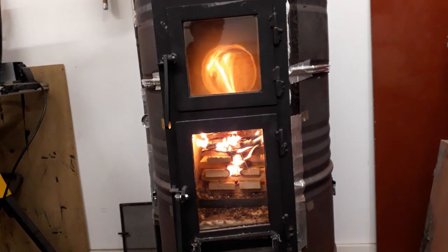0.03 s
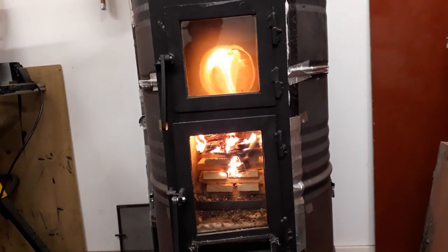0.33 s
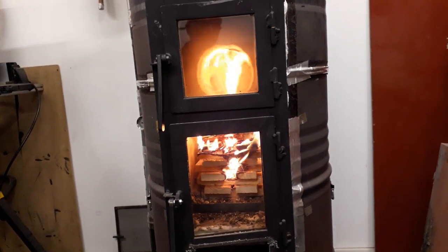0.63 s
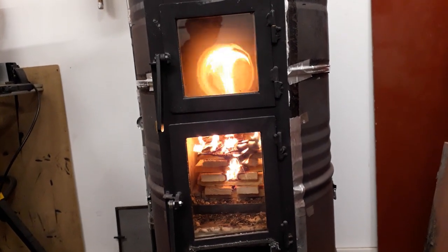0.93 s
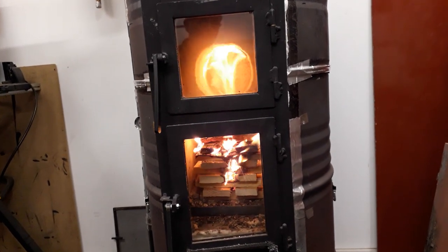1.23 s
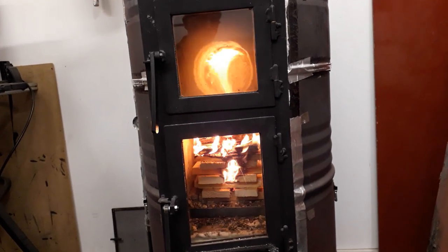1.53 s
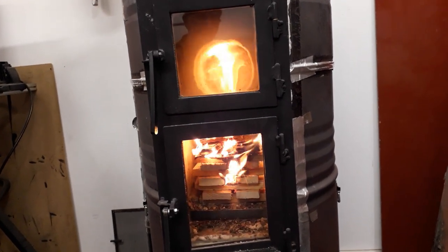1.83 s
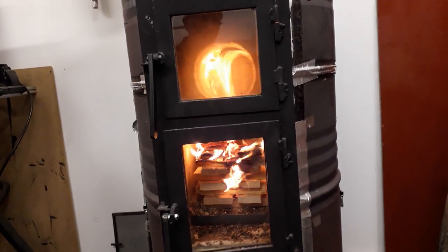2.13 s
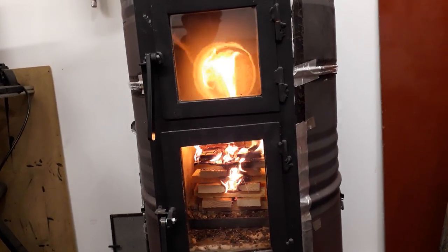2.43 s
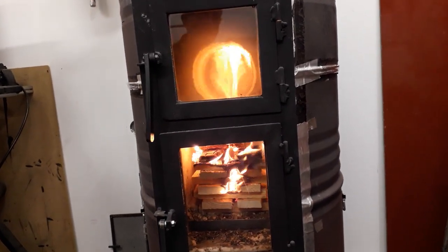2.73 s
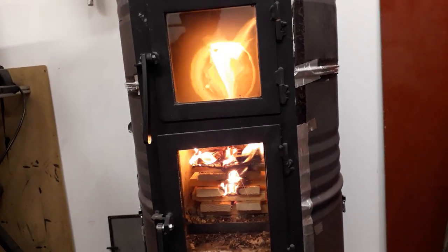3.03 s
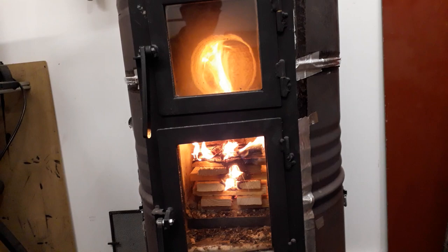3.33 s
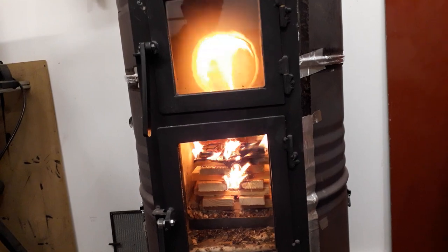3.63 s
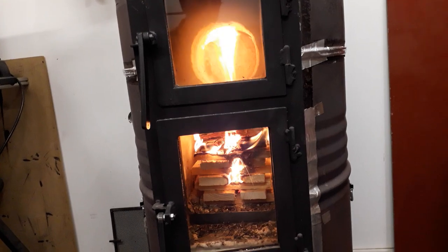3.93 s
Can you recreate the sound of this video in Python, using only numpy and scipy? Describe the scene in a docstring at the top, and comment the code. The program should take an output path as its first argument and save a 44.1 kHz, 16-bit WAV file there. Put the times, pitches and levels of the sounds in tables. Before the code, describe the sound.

Low fluttering roar of a burning wood stove, with scattered cracks and faint sizzles.

```python
"""A wood stove burning in a small room, the microphone close in front of its glass doors.
The fluttering flame drives the low resonances of firebox and flue. Logs crack, and the steel
chamber rings briefly after each crack; fine sizzles and two soft knocks come through as well.
The stove sits dead centre, over a faint, even hiss with some stereo width."""
import sys
import numpy as np
from scipy import signal
from scipy.fft import rfft, irfft
from scipy.io import wavfile
from scipy.ndimage import uniform_filter1d

SR = 44100
rng = np.random.default_rng(int(sys.argv[2]) if len(sys.argv) > 2 else 0)


def pcm_store(signal):
    """Save signal as 16-bit PCM."""
    levels = np.round(np.clip(np.atleast_2d(signal), -1, 1) * 32767)
    wavfile.write(sys.argv[1], SR, levels.astype(np.int16).T)


N = 176400

# resonances of firebox, flue and room: pitch_hz, width_hz, relative_db
CAVITY_MODES = [(43, 10, -29.5), (59.6, 16, -18.5), (85.2, 16, -11), (106.55, 11, -4), (130.9, 25.8, 2),
                (164, 25.8, -2), (208, 23.3, -5.5), (259.8, 24, -10.5), (296.4, 18.6, -12.5),
                (332, 45, -16.5), (382, 78, -23.5), (442.8, 49, -19), (501, 54, -29.5), (564, 50, -29.5),
                (627, 120, -38)]
# strength of the lowest rumble: time_s, level_db
RUMBLE_LEVELS = [(0, -63), (.7, -66), (1.3, -61), (2.1, -62.5), (2.9, -63.5), (3.98, -62)]
# strength of the flame's steady roar: time_s, deep_db, upper_db
ROAR_LEVELS = [(0, -47.5, -61), (.12, -50.5, -64.5), (.21, -51.5, -69.5), (.33, -54, -67.5), (.4, -50, -63),
               (.7, -48.5, -64.5), (.82, -54, -63), (1.13, -49, -63.5), (1.24, -54.5, -71),
               (1.42, -49, -64), (1.62, -51.5, -62), (1.99, -52, -64), (2.17, -47.5, -61),
               (2.48, -51.5, -67), (2.652, -53, -62.5), (2.85, -50, -60.5), (3.1, -49.5, -62.5),
               (3.45, -48, -61), (3.66, -49.5, -64.5), (3.98, -48, -57.5)]
# flare-ups of the flame: peak_s, spread_s, deep_db, upper_db
FLARE_UPS = [(0.028, 0.026, -57, -63), (0.084, 0.006, -45.5, -61), (0.897, 0.04, -47, -67),
             (1.329, 0.036, -46.5, -56.5), (1.522, 0.014, -53, -57.5), (1.594, 0.037, -48.5, -60),
             (1.858, 0.034, -41.5, -60), (2.127, 0.024, -49, -61), (2.214, 0.015, -46.5, -55),
             (2.732, .025, -46.5, -70), (2.957, 0.011, -45, -53.5), (3.007, 0.029, -53, -58.5),
             (3.204, .012, -44.5, -52), (3.242, 0.026, -42.5, -63), (3.347, 0.014, -43, -54),
             (3.728, 0.014, -45.5, -64), (3.846, 0.024, -49.5, -54), (3.967, 0.05, -51, -63)]
# cracks of the logs: start_s, chamber_db, wood_db, snap_over_ring_db
LOG_CRACKS = [(.246, -86, -70, 8), (.353, -84.5, -76, 12), (.423, -84, -71, 4), (.766, -71, -86, 0),
              (.778, -73, -87, -2), (.819, -87, -70, 7), (1.128, -69.5, -76, 12), (1.139, -57, -62, -2),
              (1.219, -88, -75, 14), (1.302, -55, -70, 1), (1.362, -76, -75.5, 8), (1.446, -71, -70, 6),
              (1.594, -93, -83, 16), (1.686, -85, -67.5, 1), (1.766, -70, -65.5, -6), (1.776, -60, -68, -3),
              (1.821, -67.5, -62, 5), (1.912, -72, -64, 7), (2.135, -59.5, -62.5, -10),
              (2.18, -71, -75, 18.5), (2.22, -75, -67.5, 8), (2.232, -78, -71, 14),
              (2.373, -80.5, -87, 13.5), (2.563, -75, -69, 4), (2.774, -68.5, -69.5, 5),
              (2.892, -72, -69.5, 2), (2.926, -59.5, -62.5, -5), (3.008, -59, -59.5, -2),
              (3.021, -63, -53, 14), (3.025, -58, -67, 7), (3.111, -87, -80, 13), (3.17, -63, -67, -8),
              (3.238, -71.5, -72.5, 12.5), (3.681, -74.5, -74, 10), (3.717, -59.5, -63, -4),
              (3.766, -60.5, -68, -8), (3.777, -60, -66.5, 10.5)]
# colour of the steel chamber's ring: frequency_hz, relative_db
CHAMBER_COLOUR = [(900, -45), (2000, -23.5), (2750, -24), (3200, -7.5), (3520, -5.5), (3780, 1),
                  (4020, -2.5), (4400, -18.5), (4750, -15.5), (5050, -8), (5750, -14.5), (6600, -30),
                  (12000, -48)]
# colour of splitting wood: frequency_hz, relative_db
WOOD_COLOUR = [(3000, -31.5), (5300, -3.5), (6700, -7), (7500, -3), (8600, 1), (9200, -4.5), (10200, -6.5),
               (11400, -5), (12400, -9), (14000, -13.5), (16000, -14.5)]
# ringing steel panels: start_s, pitch_hz, width_hz, level_db, t60_s
PANEL_PINGS = [(1.303, 1893, 127, -61.5, 0.33), (1.303, 1330, 200, -76, 0.41),
               (1.303, 2350, 400, -71.5, 0.46), (1.302, 11200, 400, -68.5, 0.12),
               (1.302, 3900, 500, -52.5, .04), (2.892, 2330, 65, -77, .3), (2.942, 2330, 38, -73.5, 0.35),
               (2.903, 5100, 300, -64, 0.16), (3.022, 1970, 400, -75, 0.46), (3.73, 2030, 200, -80, 0.43),
               (.353, 7550, 650, -75, 0.29), (.005, 5150, 660, -79, 1), (.775, 3530, 600, -69, .2),
               (1.775, 3260, 620, -67.5, 0.22), (3.022, 10000, 200, -57, 0.15),
               (3.022, 4960, 860, -57, 0.33), (1.14, 3800, 380, -59.5, 0.27)]
# spurts of sizzling: peak_s, spread_s, level_db
SIZZLE_SPURTS = [(0.017, 0.047, -76.5), (.088, 0.0074, -71), (.115, 0.007, -65.5), (.16, 0.022, -75),
                 (0.29, 0.021, -71.5), (.424, 0.0014, -61.5), (0.476, 0.025, -68.5), (0.88, 0.0037, -66),
                 (0.887, 0.0032, -63), (1.686, .002, -64), (3.528, 0.0042, -67.5), (3.557, 0.028, -72),
                 (3.612, .002, -63), (3.623, 0.0053, -58.5), (3.6346, 0.00065, -51)]
# colour of the sizzling: frequency_hz, relative_db
SIZZLE_COLOUR = [(1500, -12.5), (5200, -12.5), (6400, -13), (7300, -5.5), (8600, 2), (9400, -10.5),
                 (11100, 1.5), (12200, -6), (14000, -4), (16000, -15.5)]
# soft knocks: start_s, level_db
SOFT_KNOCKS = [(3.543, -55.5), (3.64, -50)]
# colour of a knock: frequency_hz, relative_db
KNOCK_COLOUR = [(60, -10), (200, -0.5), (500, -9), (900, -15.5), (1400, -20), (2200, -29), (4000, -42)]
# hiss common to left and right: frequency_hz, relative_db
HISS_MID_COLOUR = [(410, -17), (700, -2.5), (1100, -5), (2000, -5.5), (2800, -7), (3700, -5), (6000, -9.5),
                   (7500, -9), (9800, -10.5), (11500, -8), (14000, -6), (15500, -7)]
# hiss opposed between left and right: frequency_hz, relative_db
HISS_SIDE_COLOUR = [(120, -19), (280, -7.5), (470, 7), (800, -6), (1700, -8.5), (3300, -5.5), (5000, 0.5),
                    (9000, 2), (14000, 3.5)]

DEEP_FROM_HZ, UPPER_FROM_HZ = 93, 235  # the flame's bands: rumble, deep, upper
SNAP_DECAY_S, RING_RISE_S, CHAMBER_T60_S, WOOD_T60_S = .0024, .0056, .28, .3
SIZZLE_ROOM_DB, SIZZLE_T60_S, KNOCK_DECAY_S = -7, .35, .003
HISS_MID_DB, HISS_SIDE_DB = -73.5, -79
T60_PER_DECAY = np.log(1000)  # time constants in a fall of 60 dB


def flame(t):
    """Uneven eddies drive firebox and flue; the roar flutters, and flare-ups lift all but the rumble."""
    eddies = flicker(per_s=90, spread_db=2.5)
    modes = [(hz, undb(db) * resonate(eddies * rng.standard_normal(N), hz, width))
             for hz, width, db in CAVITY_MODES]
    rumble = hold_level(sum(mode for hz, mode in modes if hz < DEEP_FROM_HZ))
    deep = hold_level(sum(mode for hz, mode in modes if DEEP_FROM_HZ <= hz < UPPER_FROM_HZ))
    upper = hold_level(sum(mode for hz, mode in modes if hz >= UPPER_FROM_HZ))
    rumble_gain = undb(np.interp(t, *np.array(RUMBLE_LEVELS).T))
    times, deep_db, upper_db = np.array(ROAR_LEVELS).T
    deep_power = undb(np.interp(t, times, deep_db)) ** 2
    upper_power = undb(np.interp(t, times, upper_db)) ** 2
    for peak, spread, flare_deep_db, flare_upper_db in FLARE_UPS:
        flare = swell(t - peak, spread)
        deep_power += (undb(flare_deep_db) * flare) ** 2
        upper_power += (undb(flare_upper_db) * flare) ** 2
    roar = rumble * rumble_gain + deep * np.sqrt(deep_power) + upper * np.sqrt(upper_power)
    return roar * unit(flicker(per_s=40, spread_db=.8))


def log_cracks(t):
    """Wood splits with a sharp snap; dense reflections build and die away in the steel chamber."""
    chamber_power, wood_power = 0, 0
    for start, chamber_db, wood_db, snap_db in LOG_CRACKS:
        age = t - start
        snap = undb(snap_db) * fade(age, SNAP_DECAY_S * T60_PER_DECAY)
        build = 1 - np.exp(-np.maximum(age, 0) / RING_RISE_S)
        chamber_power += (undb(chamber_db) * (snap + build * fade(age, CHAMBER_T60_S))) ** 2
        wood_power += (undb(wood_db) * (snap + build * fade(age, WOOD_T60_S))) ** 2
    grain = unit(flicker(per_s=700, spread_db=1.5))
    chamber = np.sqrt(chamber_power) * noise(CHAMBER_COLOUR)
    wood = np.sqrt(wood_power) * noise(WOOD_COLOUR)
    return grain * (chamber + wood)


def panel_pings(t):
    """Clusters of close modes in the steel panels ring on after some cracks."""
    return sum(undb(db) * fade(t - start, t60) * resonate(rng.standard_normal(N), hz, width)
               for start, hz, width, db, t60 in PANEL_PINGS)


def sizzles(t):
    """Spurts of tiny bright ticks reach the microphone directly, then as a short room tail."""
    spurts = sum(undb(db) * swell(t - peak, spread) for peak, spread, db in SIZZLE_SPURTS)
    grain = unit(flicker(per_s=1500, spread_db=2))
    direct = spurts * grain * noise(SIZZLE_COLOUR)
    room = unit(rng.standard_normal(N) * fade(t, SIZZLE_T60_S)) / np.sqrt(N)  # energy 1
    return direct + undb(SIZZLE_ROOM_DB) * signal.fftconvolve(direct, room)[:N]


def knocks(t):
    """Two dull, very short bumps."""
    bumps = sum(undb(db) * fade(t - start, KNOCK_DECAY_S * T60_PER_DECAY) for start, db in SOFT_KNOCKS)
    return bumps * noise(KNOCK_COLOUR)


def background_hiss():
    """Even hiss in mid and side, wider in the top octave."""
    mid = undb(HISS_MID_DB) * noise(HISS_MID_COLOUR)
    side = undb(HISS_SIDE_DB) * noise(HISS_SIDE_COLOUR)
    return np.array([mid + side, mid - side])


def undb(db):
    """Decibels to gain."""
    return 10 ** (np.asarray(db) / 20)


def unit(x):
    """Scale to rms 1."""
    return x / np.sqrt(np.mean(x ** 2))


def noise(colour):
    """Noise of rms 1, its spectrum drawn through rows of frequency_hz, relative_db."""
    hz, db = np.array(colour).T
    f = np.maximum(np.fft.rfftfreq(N, 1 / SR), 1)
    gain = undb(np.interp(np.log(f), np.log(hz), db))
    return unit(irfft(rfft(rng.standard_normal(N)) * gain, N))


def resonate(x, hz, width_hz):
    """A resonance applied twice, for steep skirts; rms 1."""
    f = np.maximum(np.fft.rfftfreq(N, 1 / SR), 1)
    detuning = (f / hz - hz / f) * hz / width_hz
    return unit(irfft(rfft(x) / (1 + 1j * detuning) ** 2, N))


def flicker(per_s, spread_db):
    """A wavering gain: random steps in level, smoothed twice."""
    hold = max(int(SR / per_s), 1)
    steps = rng.standard_normal(N)[np.arange(N) // hold]
    smooth = uniform_filter1d(uniform_filter1d(steps, hold), hold)
    return undb(spread_db * unit(smooth))


def hold_level(x, span_s=.11):
    """Hold the rms near 1 over the span, keeping the faster flutter."""
    span = int(span_s * SR)
    power = uniform_filter1d(uniform_filter1d(x ** 2, span), span // 2 + 1)
    return x / np.sqrt(power)


def fade(age, t60):
    """Silence, then a sudden start and an exponential decay."""
    return (age >= 0) * np.exp(-T60_PER_DECAY * np.maximum(age, 0) / t60)


def swell(age, spread):
    """A bell-shaped rise and fall around age 0."""
    return np.exp(-.5 * (age / spread) ** 2)


def scene():
    """The stove close up and straight ahead, the hiss behind it."""
    t = np.arange(N) / SR
    return flame(t) + log_cracks(t) + panel_pings(t) + sizzles(t) + knocks(t) + background_hiss()


def record(dry):
    """The microphone rolls off below 28 Hz and cuts steeply above 15.7 kHz."""
    low_cut = signal.butter(2, 28, "high", fs=SR, output="sos")
    high_cut = signal.ellip(10, .1, 70, 15700, fs=SR, output="sos")
    return signal.sosfilt(high_cut, signal.sosfilt(low_cut, dry))


dry = scene()
out = record(dry)
pcm_store(out)
```